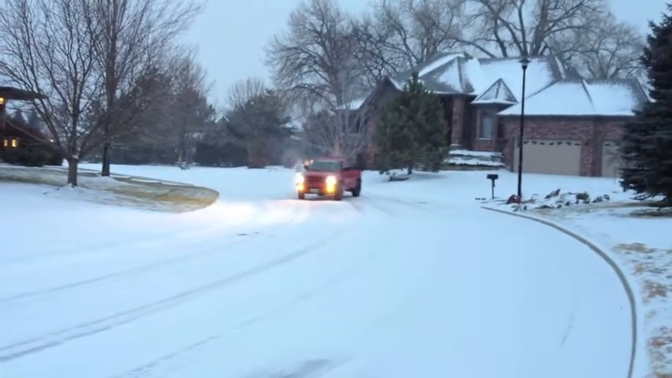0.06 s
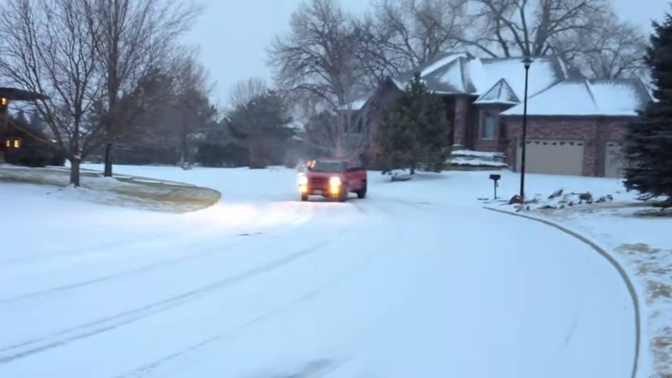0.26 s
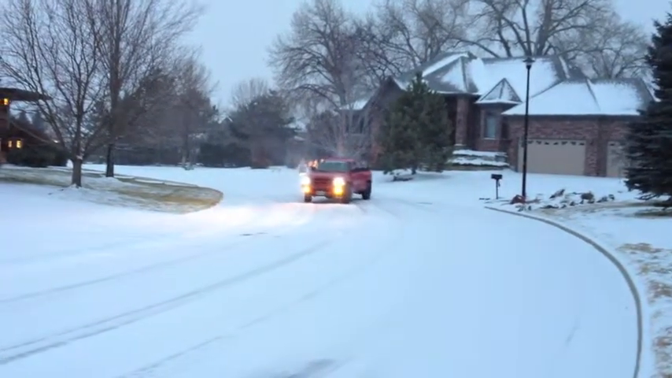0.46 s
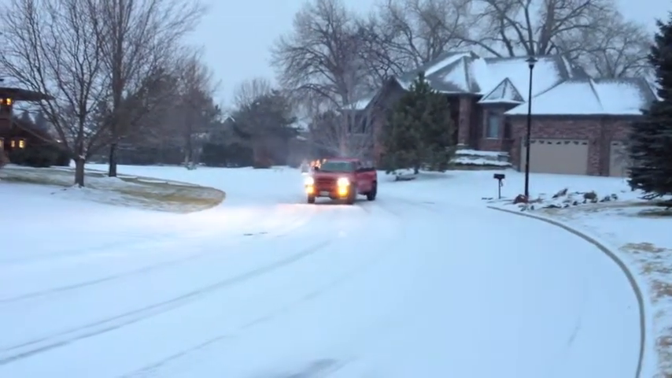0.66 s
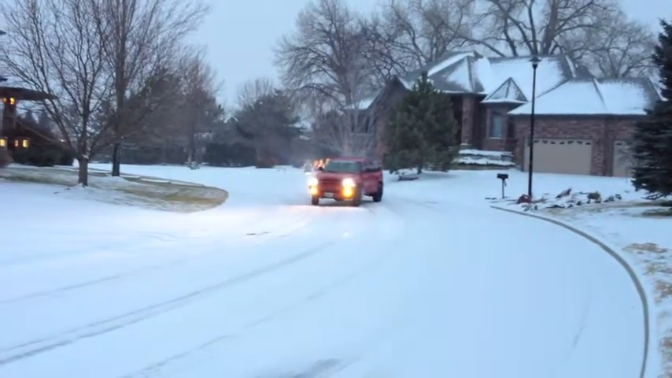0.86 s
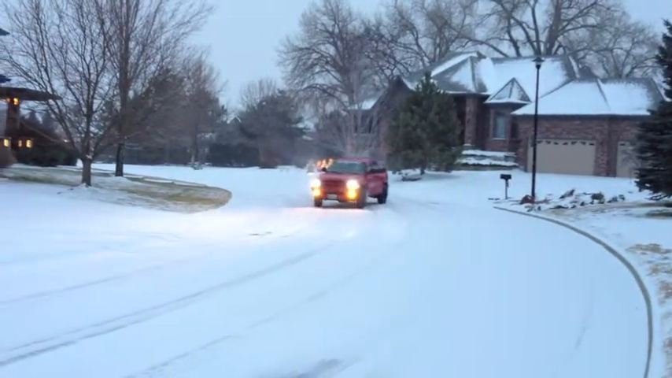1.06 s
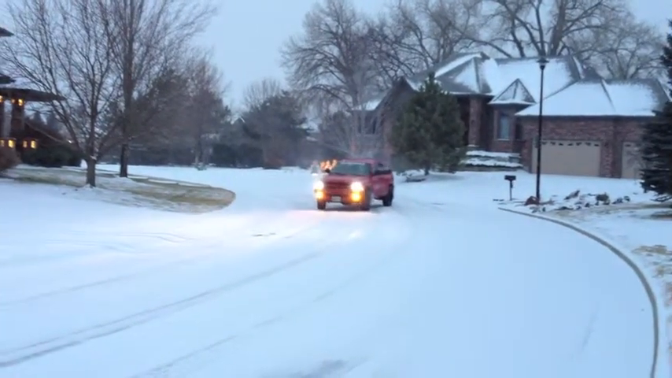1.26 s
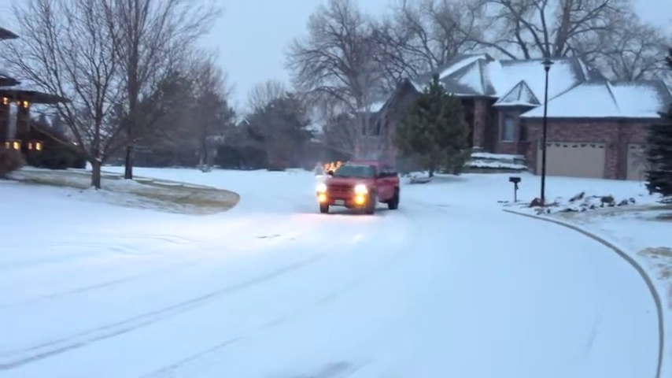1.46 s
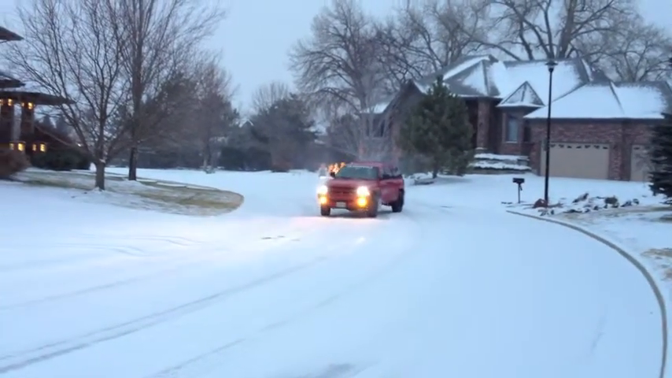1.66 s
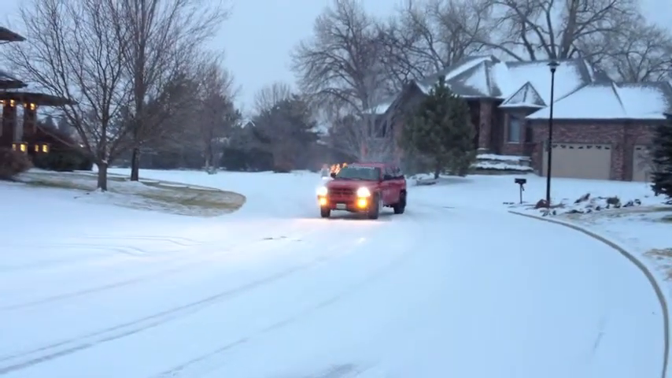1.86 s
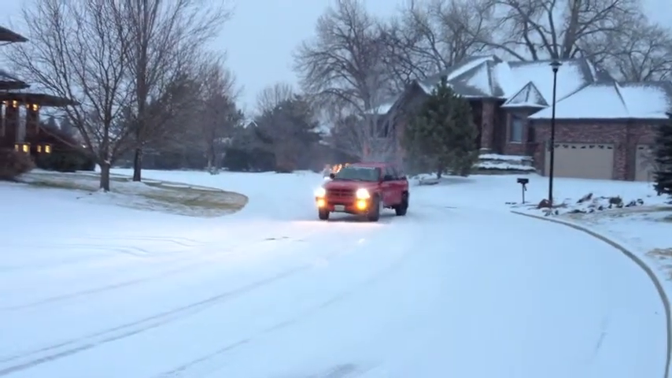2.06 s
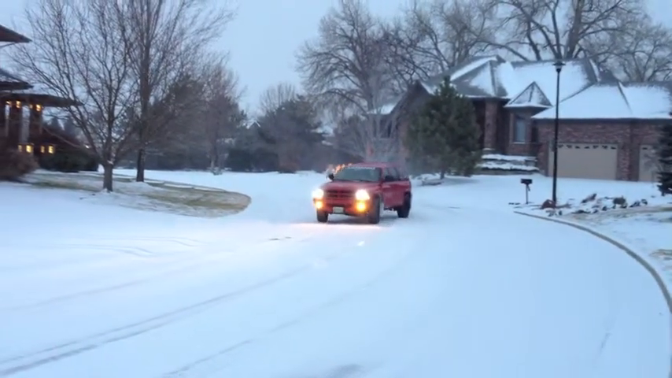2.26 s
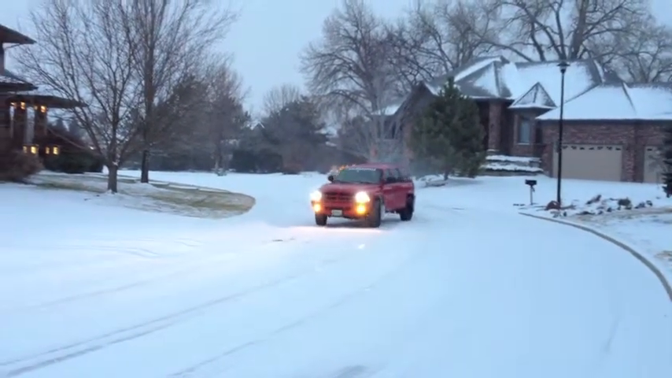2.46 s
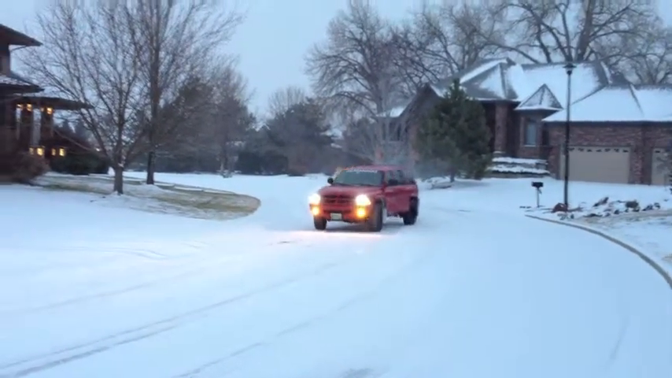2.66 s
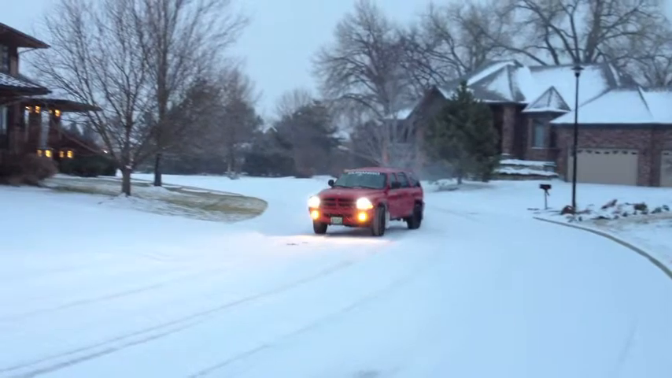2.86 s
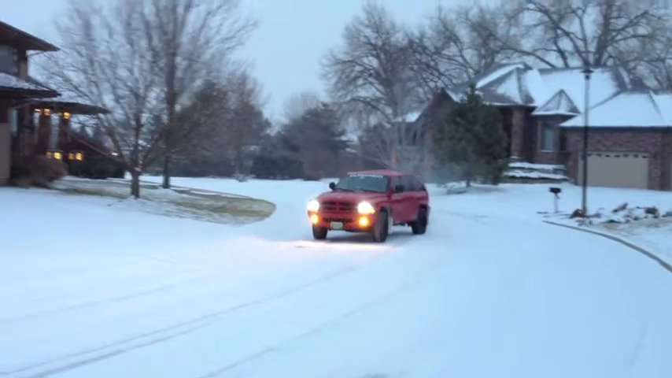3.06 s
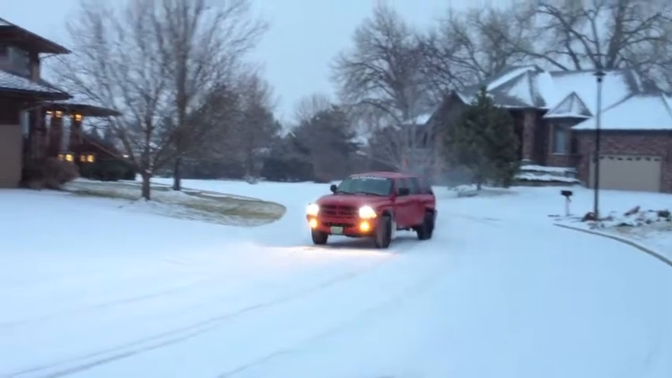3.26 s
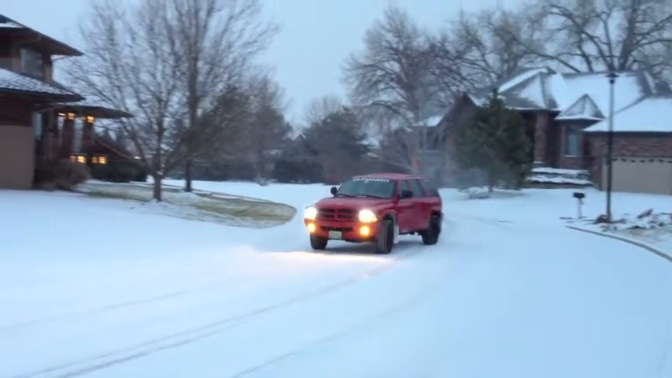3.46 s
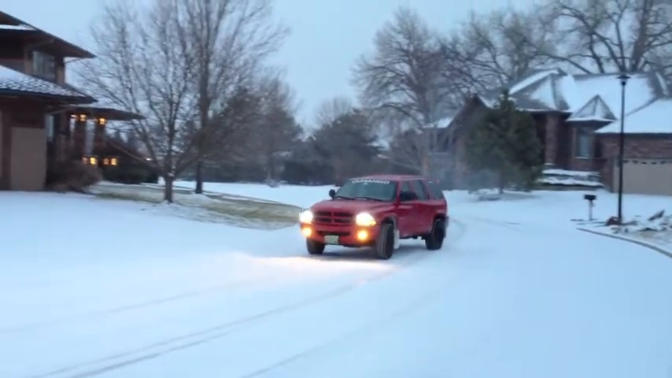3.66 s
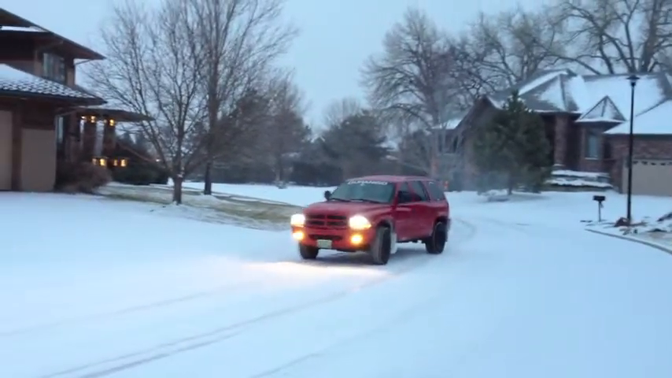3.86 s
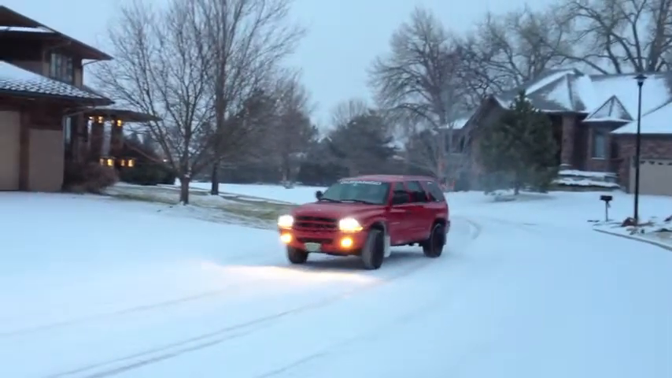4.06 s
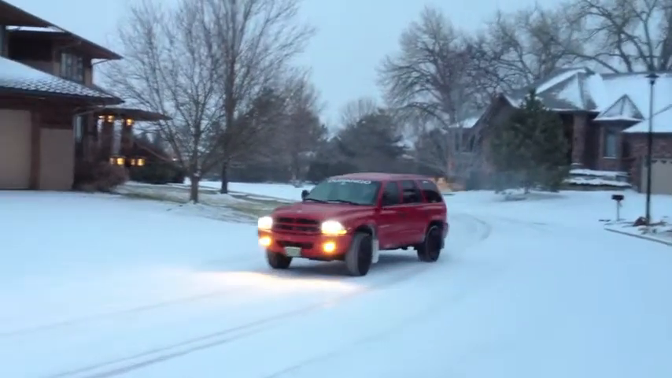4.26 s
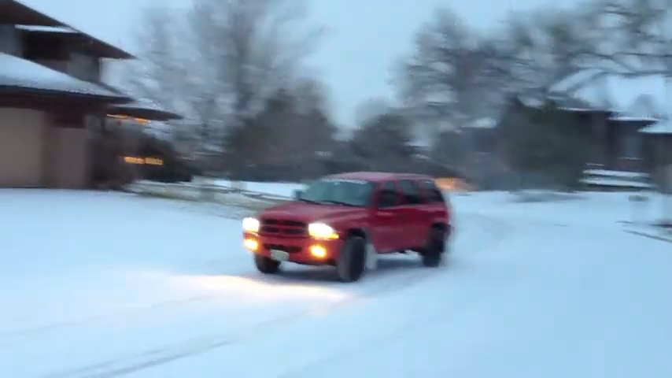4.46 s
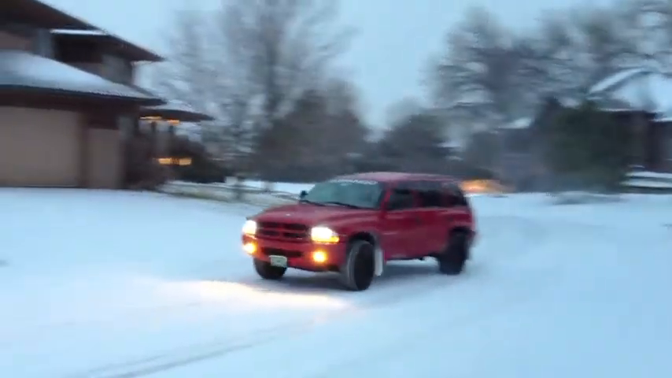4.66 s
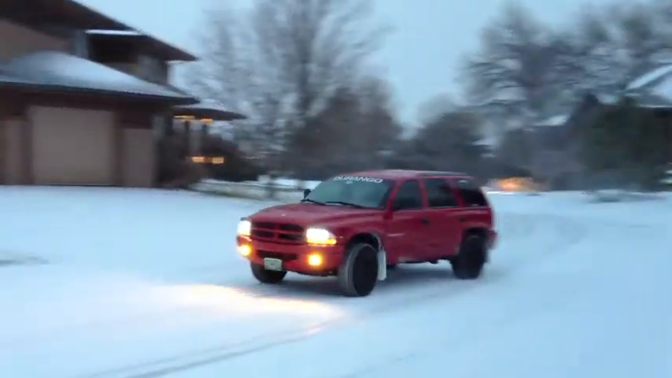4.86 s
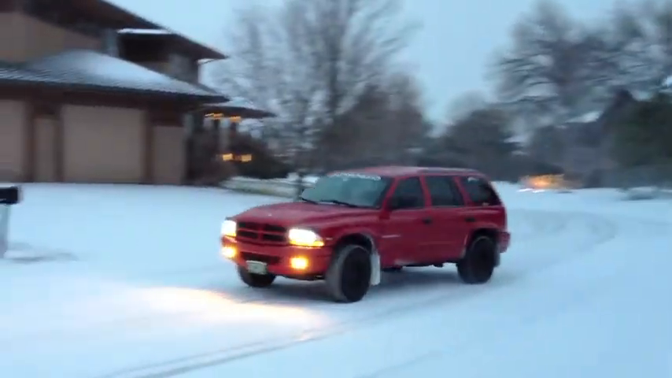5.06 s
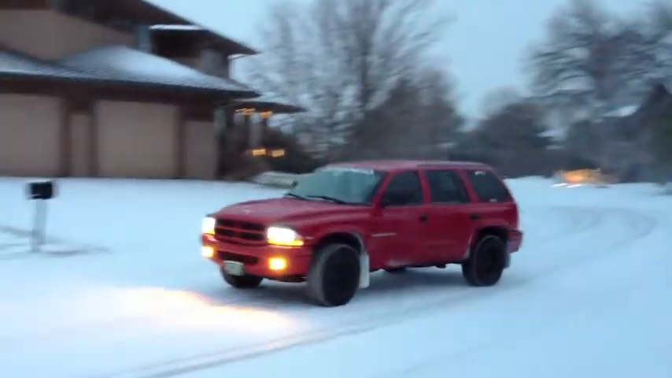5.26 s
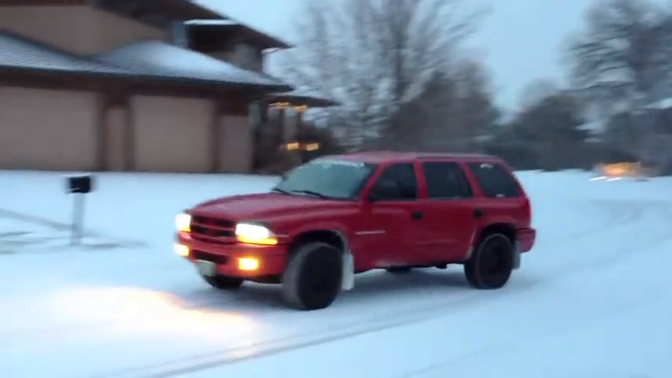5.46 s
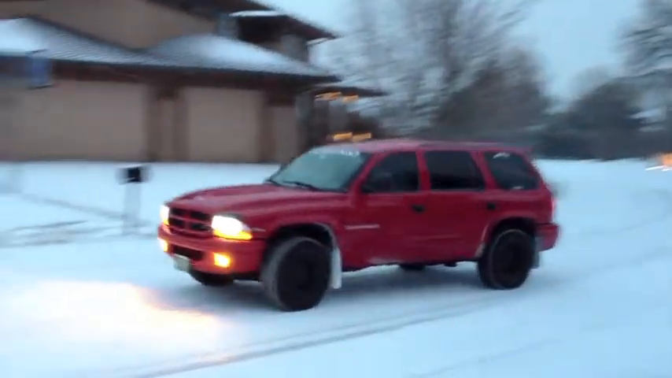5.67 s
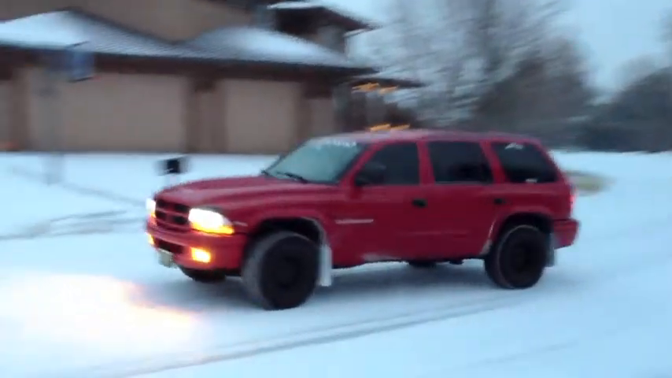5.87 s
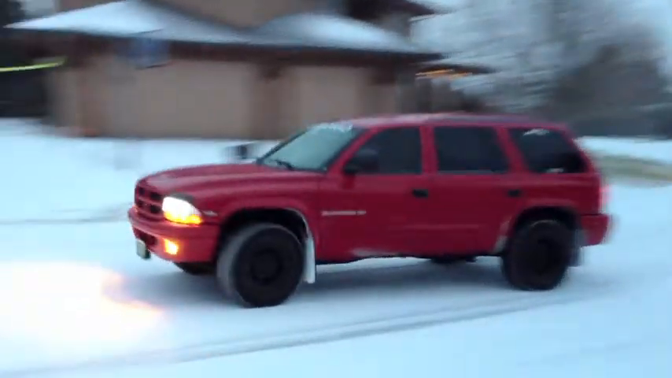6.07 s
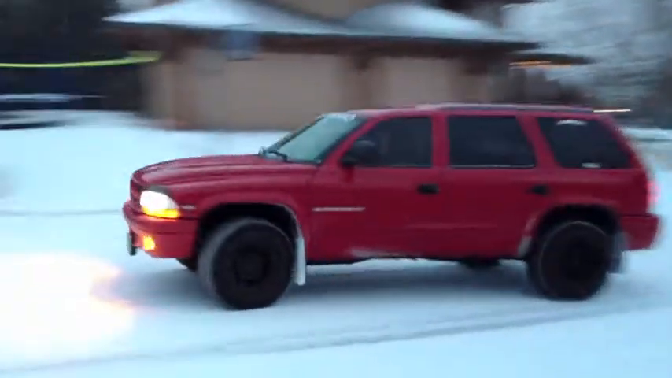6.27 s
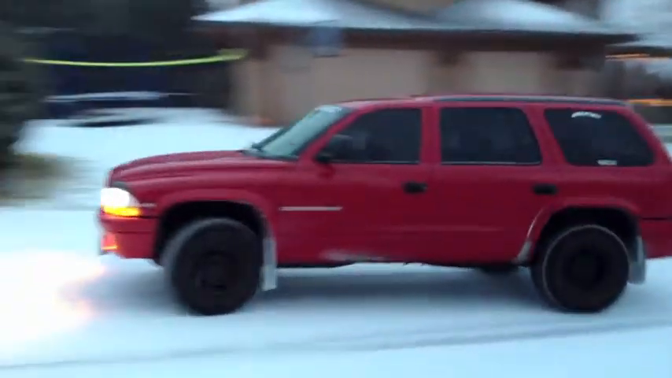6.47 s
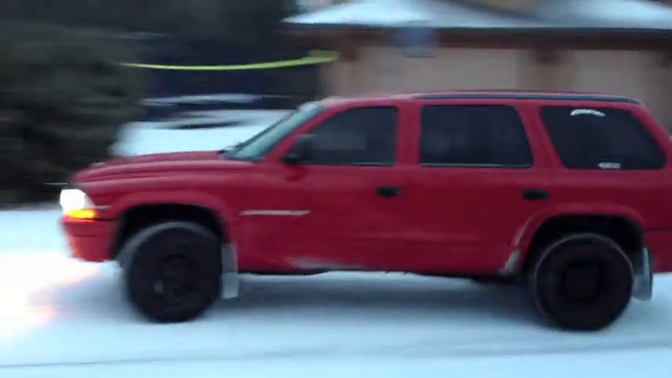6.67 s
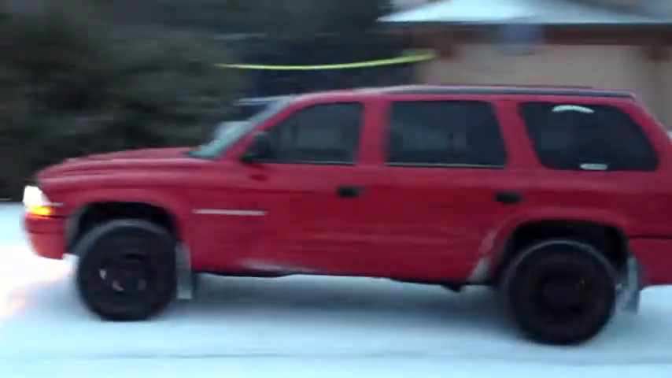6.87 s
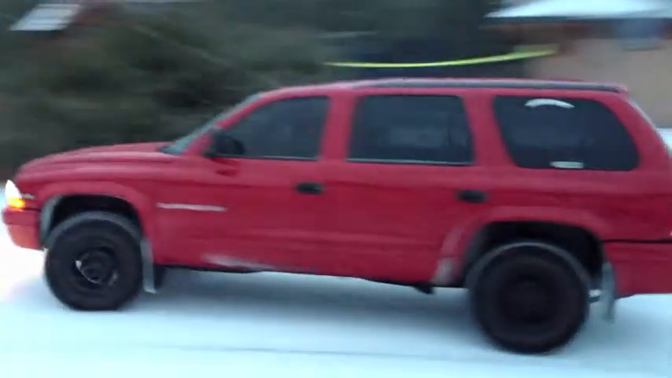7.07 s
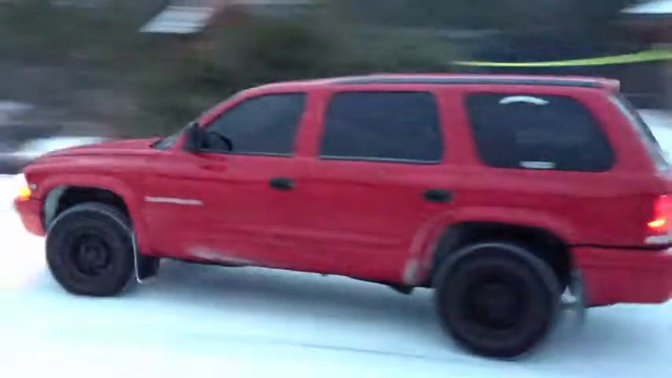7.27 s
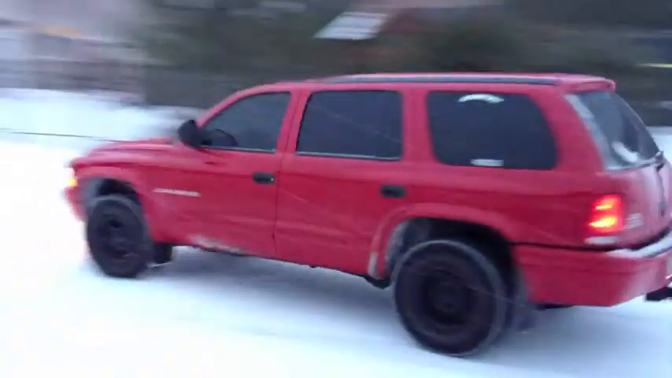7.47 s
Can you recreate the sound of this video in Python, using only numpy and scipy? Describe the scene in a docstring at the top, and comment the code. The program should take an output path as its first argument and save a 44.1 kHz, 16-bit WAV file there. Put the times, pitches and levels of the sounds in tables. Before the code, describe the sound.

A V8 SUV rumbles up a snowy street and passes close by, exhaust burbling louder as its tyres crunch and creak over snow.

```python
"""V8 truck passing on snow

A truck rolls up a snowy street at low revs and passes close by, its tailpipe turning toward the listener.
Periodic firings make the exhaust boom; uneven ones excite the pipe's resonances into a burble, and
turbulent gas rasps. The engine bay whirs. Under the tyres snow crunches by brittle fracture, creaks and
squeaks by stick-slip friction, and a few bits of grit snap, all over the low rumble of the street."""
import sys
import numpy as np
from scipy import signal
from scipy.fft import rfft, irfft, next_fast_len
from scipy.io import wavfile
from scipy.ndimage import uniform_filter1d

SR = 44100
rng = np.random.default_rng(int(sys.argv[2]) if len(sys.argv) > 2 else 0)


def inscribe(sig):
    """Save sig as 16-bit PCM at rate SR to the path in sys.argv[1].

    A 1-D sig is mono; a 2-D sig holds one channel per row.
    Samples are clipped to [-1, 1] before scaling.
    """
    pcm = np.round(np.clip(np.atleast_2d(sig).T, -1, 1) * 32767)
    wavfile.write(sys.argv[1], SR, pcm.astype(np.int16))


N = 332073
TIME = np.arange(N) / SR
CONTROL_S = np.arange(0, N / SR + .002, .002)
CYLINDERS = 8

# heavy firings that make the exhaust chuff: centre_s, length_s, burble_gain_db, rasp_gain_db
CHUFFS = [(1.246, .05, 0, 6), (1.477, .05, 5, 2), (2.02, 0.047, 7, -3), (2.29, .05, 6, 3),
          (2.667, 0.19, 0, 4), (2.85, 0.042, 8, 2), (3.727, 0.046, 13.5, 0), (4.207, .05, 7.5, 3),
          (4.47, .05, 6.5, 0), (4.907, 0.045, 5, -2), (5.95, 0.042, 3, 3.5), (6.102, 0.057, 8, 0),
          (6.27, 0.064, 9, -2), (6.515, 0.044, 11.5, 1), (6.64, 0.043, 4, -5.5), (6.805, 0.091, 8.5, -0.5),
          (6.926, 0.054, 5.5, 2), (7.124, 0.04, 9.5, 1.5), (7.363, .12, 8, 4)]
# slips of the tread, most of all through the bend: centre_s, length_s, creak_gain_db, squeak_gain_db
SLIPS = [(0.137, 0.088, 3, 0), (0.756, .04, 5, 0), (1.035, 0.045, 5, 4), (1.2, 0.044, 3, 3),
         (1.55, 0.046, 3, 4), (1.802, 0.044, 5.5, 2), (2.876, .06, 7, 8), (2.98, 0.062, 7, 12),
         (3.13, 0.078, 4.5, 10), (3.26, 0.085, 7, 14), (3.41, .06, 5, 13), (3.516, 0.066, 6.5, 11),
         (3.676, 0.026, 9, 0), (3.775, 0.079, 7.5, 5), (3.912, .06, 4.5, 2), (5.37, 0.11, 4, 0),
         (5.59, 0.072, 4.5, 12), (6.186, .04, 0, 0)]


def exhaust_tones(cycle, near, facing, waver_db=1.4, throb_db=.5):
    """Periodic pulses form a harmonic series: the firing rate booms, uneven banks add the other orders."""
    # boom at the firing rate: time_s, level_db
    boom_level = [(0, -41), (.35, -38.5), (1.15, -46), (2.35, -35.5), (3.2, -38), (4.15, -27), (5.0, -29),
                  (5.95, -21.5), (6.6, -21.5), (7.15, -20), (7.53, -25.5)]
    # exhaust harmonics: order (rounded for pitch), far_db, approaching_db, near_db, facing_db
    orders = [(5, -18, -19, -19.5, -21.5), (6, -18.5, -20, -23.5, -26), (7, -13.5, -16.5, -13, -7.5),
              (9, -22.5, -23.5, -16, -18.5), (11, -18.5, -14.5, -17.5, -12.5), (13, -9, -0.5, -3.5, -14),
              (14.56, -10, -4, -4, -18), (16.25, 4.5, -0.5, -3, -11), (16.8, -15.5, -17, -23, -18),
              (19, -28, -20.5, -14.5, -15), (20.86, -12, -12.5, -23, 1.5), (22.2, -19, -14.5, -13, -13.5),
              (23.93, -10.5, -25.5, -18, -20), (25.12, -22, -20, -15, -18), (36.05, -23, -19.5, -22, -18.5),
              (41.9, -21, -22.5, -34.5, -18.5), (44.06, -27, -14.5, -26, -23), (44.9, -34, -21, -21, -15)]
    # their common level: far_db, approaching_db, near_db
    drone_level = (-43.5, -37, -30.5)
    # their gain as the tailpipe turns: side_on_db, half_turned_db, facing_db
    beam = (0, 3, 4)
    boom_fade, drone_fade = echo_fading()
    boom = from_db(in_time(boom_level)) * boom_fade * np.cos(2 * np.pi * CYLINDERS * cycle)
    drone = 0
    for order, *distance_db, facing_db in orders:
        level_db = blend(facing, blend(near, *distance_db), facing_db) + waver_db * drift(1.5)
        # the muffler holds orders back the longer the further they lie from the firing rate, smearing each beat
        # into a soft throb
        lag = .04 * (order - CYLINDERS) ** 2 + .17 * drift(2)
        drone += from_db(level_db) * np.cos(2 * np.pi * round(order) * cycle - lag)
    drone_db = blend(near, *drone_level) + blend(facing, *beam) + throb_db * drift(7)
    return np.sqrt(2) * (boom + drone * drone_fade * from_db(drone_db))


def echo_fading():
    """Gains of boom and drone, dipping briefly as where echoes interfere destructively."""
    # interference nulls: centre_s, half_width_s, boom_depth_db, drone_depth_db
    nulls = [(.12, 0.038, 0, -3), (.25, .03, 0, -12), (.77, .025, -9, -2), (.92, 0.027, -12, 0),
             (1.15, 0.14, 0, -6.5), (1.6, 0.027, -4, 0), (1.72, 0.076, -2, -9), (2.78, 0.061, 0, -18),
             (3.46, .09, -16, -1.5), (3.87, 0.11, -19, 1), (4.375, 0.098, -23, 0), (4.84, 0.14, -27, -1),
             (5.17, 0.14, -19.5, 0), (5.68, 0.069, -2.5, 3), (6.77, 0.069, -8, 0), (7.38, 0.034, -22, 0)]
    gains = 1
    for centre_s, half_width_s, *depth_db in nulls:
        lost_power = 1 - from_db(np.minimum(depth_db, 0))[:, None] ** 2
        gains *= np.sqrt(1 - lost_power * np.exp(-((CONTROL_S - centre_s) / half_width_s) ** 2))
    return [np.interp(TIME, CONTROL_S, gain) for gain in gains]


def exhaust_burble(cycle, near, facing, scatter_s=.0015):
    """Impulse excitation: each firing kicks the pipe's modes with a strength and timing of its own."""
    # pipe resonances: pitch_hz, width_hz, level_db
    modes = [(73, 22, -4), (98, 39, 3.5), (138, 34, -5), (177.1, 19, -2), (233, 35, -15)]
    # burble level: far_db, approaching_db, near_db
    level = (-47, -40.5, -35)
    # gain as the tailpipe turns: side_on_db, half_turned_db, facing_db
    beam = (-0.5, 10.5, 12)
    firings = np.flatnonzero(np.diff(np.floor(CYLINDERS * cycle)))
    burble = 0
    for hz, width_hz, db in modes:
        strength, late = rng.standard_normal((len(firings), 2)).T
        onsets = firings + (late * scatter_s * SR).astype(int)
        kicks = np.zeros(N)
        kicks[np.clip(onsets, 0, N - 1)] = strength
        burble += from_db(db) * ringing(kicks, hz, width_hz)
    level_db = blend(near, *level) + blend(facing, *beam) + swells(CHUFFS, layer=0)
    return evened(burble, span_s=.05) * from_db(level_db)


def exhaust_rasp(facing):
    """Turbulent gas radiates broadband noise, its highs beamed along the pipe's axis."""
    # rush of gas: time_s, level_db
    level = [(0, -54.5), (2.1, -53), (3.35, -50), (3.8, -44.5), (5.25, -43.5), (6.35, -40), (7.0, -30.5),
             (7.53, -32)]
    # its spectrum side-on and facing: frequency_hz, density_db
    side_spectrum = [(150, -28.5), (240, -12), (300, -2), (370, -2), (420, -3.5), (500, -10), (620, -19.5),
                     (1000, -29), (2000, -49)]
    facing_spectrum = [(150, -21.5), (220, 4.5), (300, 0), (360, 1.5), (450, -4.5), (600, -9), (700, -15.5),
                       (900, -10.5), (1400, -17), (2000, -34), (4000, -50)]
    gas = rng.standard_normal(N)
    rasp = blend(facing, coloured(gas, side_spectrum), coloured(gas, facing_spectrum))
    return evened(rasp, span_s=.08) * from_db(in_time(level) + swells(CHUFFS, layer=1))


def engine_bay(near, facing, shadow_db=-1.0):
    """Fan rush and fine clatter grow on approach; the body casts an acoustic shadow once the nose is by."""
    # whir: time_s, level_db
    level = [(0, -54), (3.0, -52), (3.82, -48.5), (5.4, -45.5), (6.7, -39.5), (7.0, -42), (7.35, -40.5),
             (7.53, -40)]
    # its spectrum from afar, approaching and alongside: frequency_hz, density_db
    far = [(250, -19), (450, -8.5), (570, -5.5), (660, -1), (780, -.5), (930, -3), (1100, 1.5), (1300, -8),
           (1500, -8), (1950, -18.5), (2250, -17), (2450, -32), (3400, -32.5), (6000, -77.5)]
    mid = [(250, -32), (450, -4), (570, -11.5), (660, 2), (800, 0.5), (950, -4.5), (1150, 2), (1350, -4.5),
           (1700, -8.5), (2020, -13.5), (2250, -13.5), (2480, -14.5), (3400, -38.5), (6000, -85.5)]
    close = [(250, -30), (450, 5), (560, -4.5), (670, -9), (830, 0.5), (1000, -2.5), (1250, -1.5),
             (1500, -6), (1750, -10.5), (2050, -8), (2500, -21), (3400, -17), (6000, -61)]
    rush = grains(per_s=6000, spread_db=1.2)
    views = [from_db(db) * coloured(rush, shape) for db, shape in [(.04, far), (1, mid), (1.7, close)]]
    return from_db(in_time(level) + shadow_db * facing) * blend(near, *views)


def tyres(near):
    """The rolling load breaks and shears snow; creak and squeak follow part of the crunch's swing."""
    # crunch, loudest as the wheels go by: time_s, level_db
    level = [(0, -68.5), (.95, -71.5), (1.2, -68), (2.6, -65.5), (3.6, -60.5), (5.45, -57.5), (6.2, -53.5),
             (6.55, -53.5), (6.61, -48), (6.78, -49), (6.9, -54), (7.53, -54)]
    crunch_db = in_time(level)
    swing_db = crunch_db - crunch_db.mean()
    clumps = from_db(drift(60))   # the snow gives way in clumps
    return (snow_crunch(near, clumps, level_db=crunch_db)
            + snow_creak(clumps, level_db=-60 + .69 * swing_db)
            + tread_squeak(level_db=-76 + .71 * swing_db))


def snow_crunch(near, clumps, level_db):
    """Brittle fracture: snow crystals break under the tread in a dense train of clicks."""
    # crunch spectrum from afar and alongside: frequency_hz, density_db
    far_spectrum = [(2000, -26), (3400, 0), (3820, -5.5), (3900, -2.5), (4020, -3.5), (4200, -8),
                    (4420, -8.5), (4820, 2), (5300, -1), (6250, 0.5), (6810, -3.5), (7340, -4),
                    (7700, -13.5), (10000, -44.5), (16900, -120)]
    close_spectrum = [(1880, -33.5), (3200, 1), (3950, -3), (6110, -0.5), (7130, -7.5), (7700, -16),
                      (10000, -57), (16900, -120)]
    breaks = grains(per_s=6000, spread_db=2.4) * clumps
    far = from_db(1.5) * coloured(breaks, far_spectrum)
    close = from_db(2) * coloured(breaks, close_spectrum)
    return from_db(level_db) * blend(near, far, close)


def snow_creak(clumps, level_db):
    """Stick-slip friction in the packed layer excites narrow resonances."""
    # creak resonances: pitch_hz, width_hz, level_db
    modes = [(2260, 130, -4), (2772, 170, 0.5), (3015, 200, 1.5), (3270, 220, -5.5)]
    creak = 0
    for hz, width_hz, db in modes:
        jerks = grains(per_s=1500, spread_db=2.2) * clumps
        creak += from_db(db) * ringing(jerks, hz, width_hz, skirt=3.1)
    return evened(creak, span_s=.06) * from_db(level_db + swells(SLIPS, layer=0))


def tread_squeak(level_db, flutter_db=2.0):
    """Stick-slip friction of rubber on cold snow drives one high resonance."""
    squeak = ringing(grains(per_s=1500, spread_db=2.2), hz=4120, width_hz=130)
    gain_db = swells(SLIPS, layer=1) + flutter_db * drift(30)
    return evened(squeak, span_s=.05) * from_db(level_db + gain_db)


def grit():
    """Hard bits snap in damped bursts; the shorter the decay, the wider the band."""
    # snaps under the tyres: start_s, peak_db, centre_hz, t60_s
    ticks = [(0.2245, -57, 5000, 0.0097), (1.0416, -49.5, 3000, .03), (1.98, -44, 3100, 0.024),
             (2.2124, -44, 1870, 0.06), (2.2137, -47, 4200, 0.0098), (2.222, -51, 7000, 0.018),
             (5.8016, -34.5, 6500, 0.016), (6.2298, -37, 4000, .012), (6.5581, -24, 3300, 0.0066),
             (6.617, -37, 4000, 0.011), (6.6784, -30, 3400, 0.0087)]
    out, age = np.zeros(N), np.arange(SR // 10) / SR
    for start_s, peak_db, hz, t60_s in ticks:
        burst = rng.standard_normal(len(age)) * from_db(-60 * age / t60_s)
        crack = resonance(burst, hz, width_hz=12 / t60_s)
        start = round(start_s * SR)
        out[start:start + len(age)] += from_db(peak_db) * crack / np.abs(crack).max()
    return out


def street(level_db=-61.5):
    """Stationary ambient noise, strongest in the bass."""
    # street background: frequency_hz, density_db
    spectrum = [(15, 8), (30, -2.5), (50, 1), (200, -8), (1000, -20), (7000, -32)]
    return from_db(level_db) * coloured(rng.standard_normal(N), spectrum)


def from_db(db):
    """Decibels to amplitude ratio."""
    return 10 ** (np.asarray(db) / 20)


def rms_one(x):
    """Normalisation to unit rms."""
    return x / np.sqrt(np.mean(x ** 2) + 1e-20)


def in_time(rows):
    """Linear interpolation of (time_s, value) rows at every sample."""
    return np.interp(TIME, *np.transpose(rows))


def blend(share, *stages):
    """Linear crossfade through the stages as the share goes from 0 to 1."""
    place = share * (len(stages) - 1)
    return sum(stage * np.maximum(1 - np.abs(place - k), 0) for k, stage in enumerate(stages))


def swells(rows, layer):
    """Gaussian rises in dB; layer picks the gain column after centre_s and length_s."""
    rises = sum(db[layer] * np.exp(-(2 * (CONTROL_S - s) / length) ** 2) for s, length, *db in rows)
    return np.interp(TIME, CONTROL_S, rises)


def drift(rate_hz):
    """Low-pass random fluctuation of unit rms."""
    hop, settle = 100, 1000
    pole = np.exp(-2 * np.pi * rate_hz * hop / SR)
    noise = rng.standard_normal(N // hop + settle + 2)
    slow = signal.lfilter([1], [1, -2 * pole, pole * pole], noise)[settle:]
    return np.interp(np.arange(N) / hop, np.arange(len(slow)), rms_one(slow))


def grains(per_s, spread_db):
    """Shot noise of unit rms: random clicks, many small and a few large."""
    sizes = from_db(spread_db * np.minimum(rng.exponential(1, N), 4))
    return rms_one(sizes * rng.choice([-1, 1], N) * (rng.random(N) < per_s / SR))


def coloured(x, spectrum):
    """Spectral shaping by (frequency_hz, gain_db) rows, scaled to unit rms."""
    hz, db = np.transpose(spectrum)
    size = next_fast_len(N)
    bins_hz = np.maximum(np.arange(size // 2 + 1) * SR / size, 1)
    gain = from_db(np.interp(np.log(bins_hz), np.log(hz), db))
    return rms_one(irfft(rfft(x, size) * gain, size)[:N])


def resonance(x, hz, width_hz):
    """Damped resonator: a two-pole band-pass with unit peak gain."""
    r = np.exp(-np.pi * width_hz / SR)
    feedback = [1, -2 * r * np.cos(2 * np.pi * hz / SR), r * r]
    return signal.lfilter(np.array([1, 0, -1]) * (1 - r * r) / 2, feedback, x + 1e-18)


def ringing(x, hz, width_hz, skirt=2):
    """Two resonators in cascade, the second skirt times as wide; unit rms."""
    return rms_one(resonance(resonance(x, hz, width_hz), hz, skirt * width_hz))


def evened(x, span_s):
    """Gain control that holds the running rms at 1."""
    power = uniform_filter1d(x * x, int(span_s * SR))
    return x / np.sqrt(np.maximum(power, 1e-12))


def scene(strong_beat_s=5.975):
    """Superposition of exhaust, engine bay, tyres and street."""
    # engine speed: time_s, firing_rate_hz
    speed = [(0, 65), (.3, 61.4), (.7, 59.4), (1.3, 59.3), (2.2, 60.4), (2.8, 62.5), (3.5, 64.6),
             (4.2, 66.5), (4.8, 67), (5.6, 66.7), (6.4, 65.9), (6.9, 67.4), (7.53, 69.8)]
    # how near the truck is: time_s, share (0-1)
    nearness = [(0, 0), (2.6, 0.07), (3.6, 0.37), (4.5, 0.5), (5.8, 0.9), (6.7, 1), (7.53, 1)]
    # how far the tailpipe faces the listener: time_s, share (0-1)
    pipe_turn = [(0, 0.09), (6.3, 0.04), (6.8, 0.43), (7.1, 0.6), (7.3, 1), (7.53, 0.83)]
    near, facing = in_time(nearness), in_time(pipe_turn)
    cycle = np.cumsum(in_time(speed)) / CYLINDERS / SR
    cycle -= np.interp(strong_beat_s, TIME, cycle)   # whole engine cycles fall on the strong beat
    exhaust = exhaust_tones(cycle, near, facing) + exhaust_burble(cycle, near, facing)
    exhaust += exhaust_rasp(facing)
    return (exhaust + tyres(near) + grit() + engine_bay(near, facing) + street())[None]


def record(dry, ceiling=.55, low_hz=32, high_hz=7650):
    """Soft saturation rounds the peaks; band-limiting drops the deepest bass and cuts the top steeply."""
    rounded = dry / (1 + (dry / ceiling) ** 4) ** .25
    trimmed = signal.sosfilt(signal.butter(4, low_hz, "high", fs=SR, output="sos"), rounded)
    return signal.sosfilt(signal.ellip(12, .2, 80, high_hz, fs=SR, output="sos"), trimmed)


dry = scene()
out = record(dry)
inscribe(out)
```